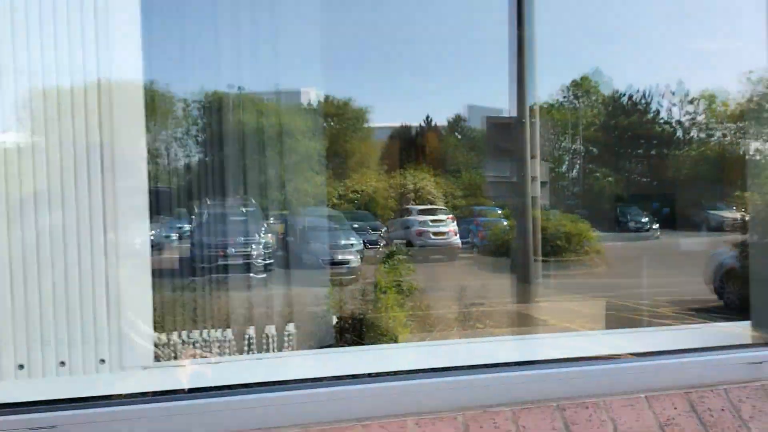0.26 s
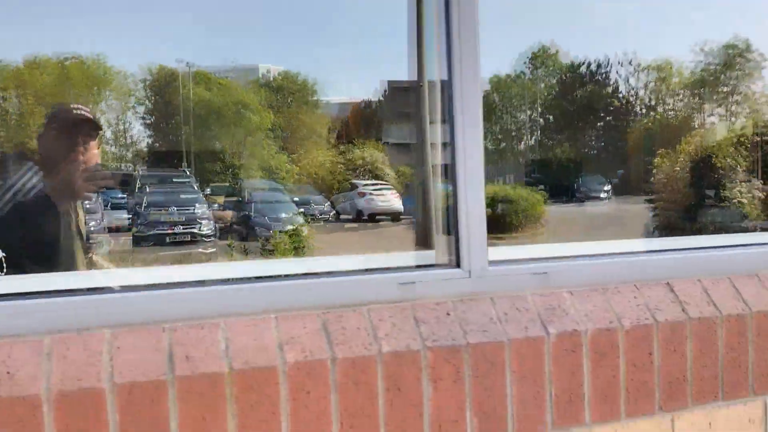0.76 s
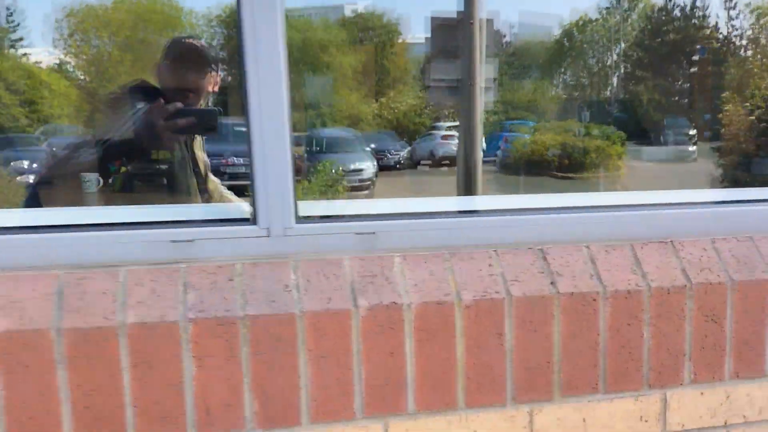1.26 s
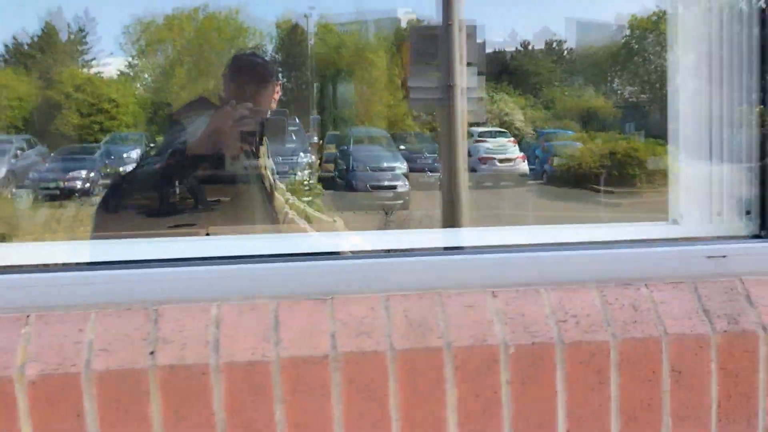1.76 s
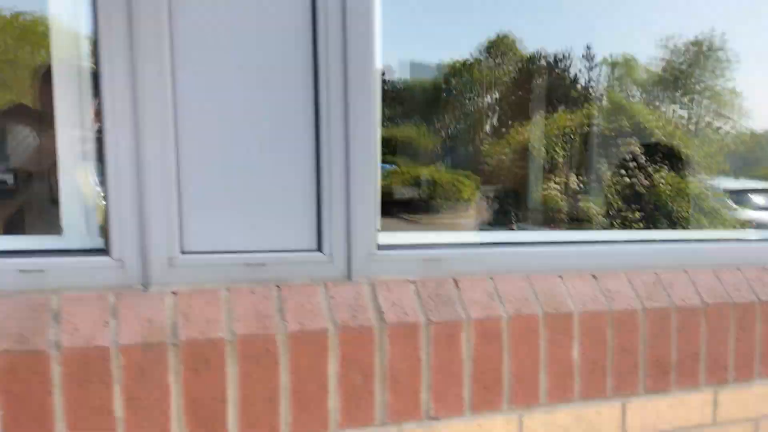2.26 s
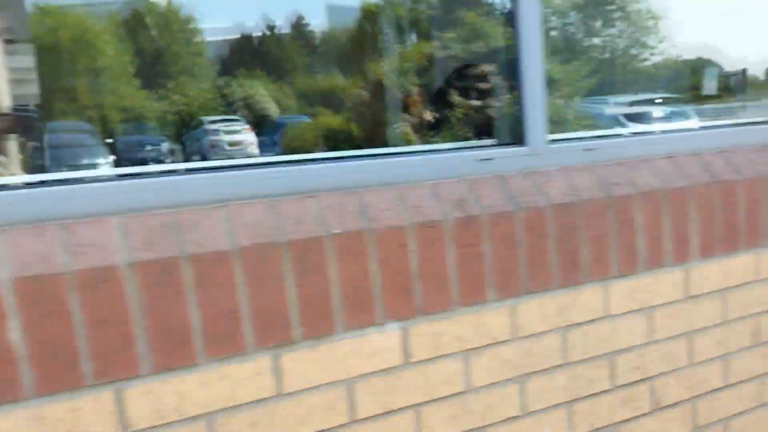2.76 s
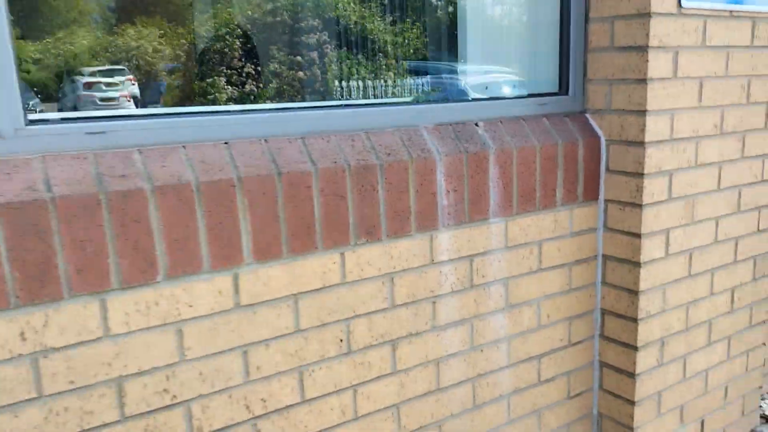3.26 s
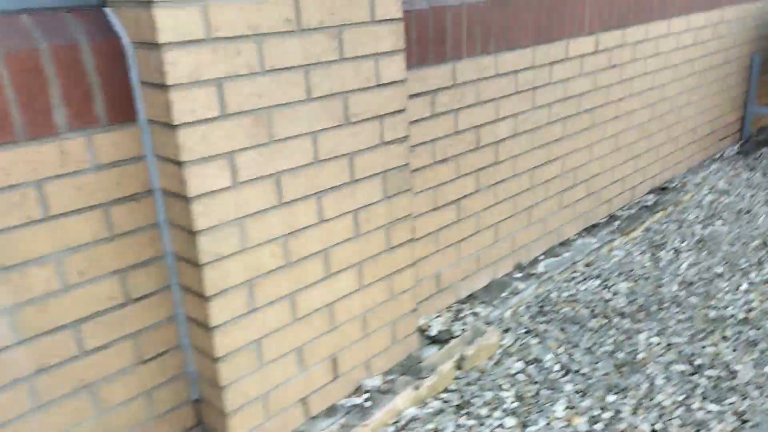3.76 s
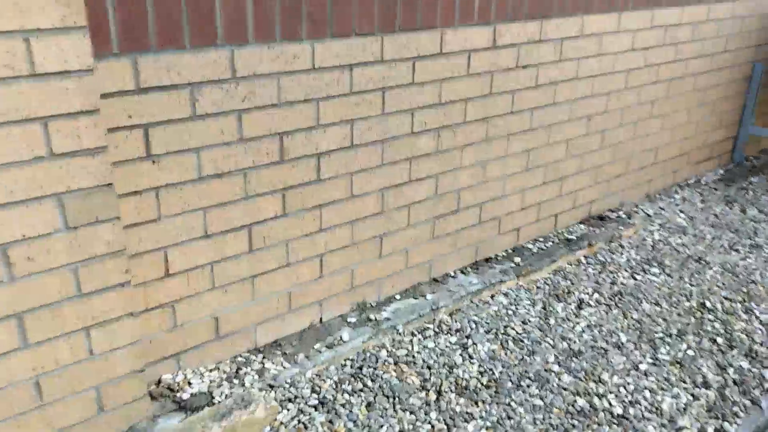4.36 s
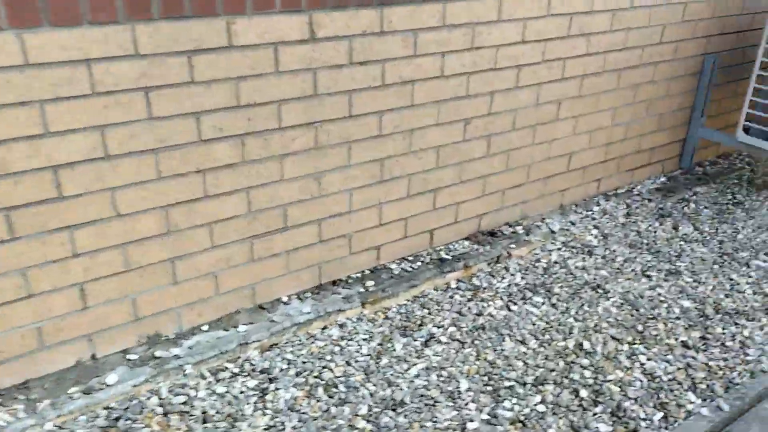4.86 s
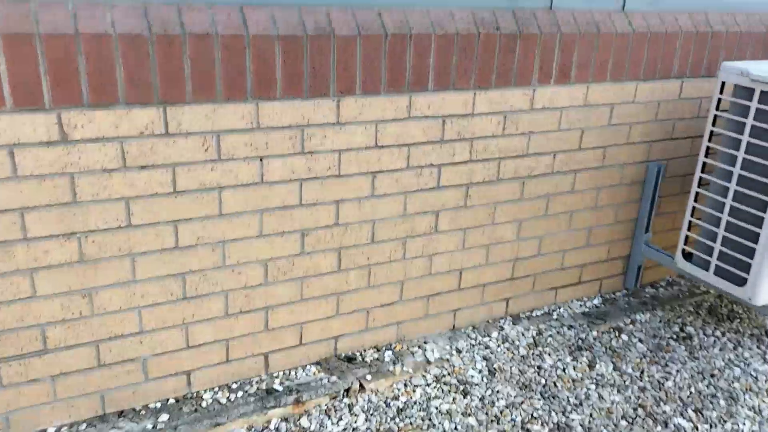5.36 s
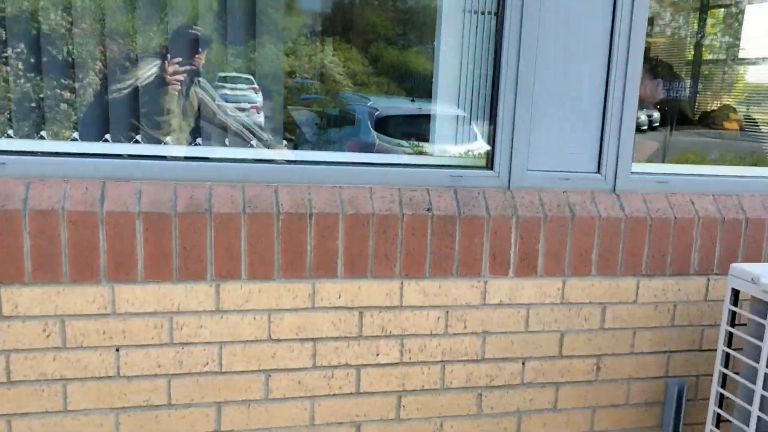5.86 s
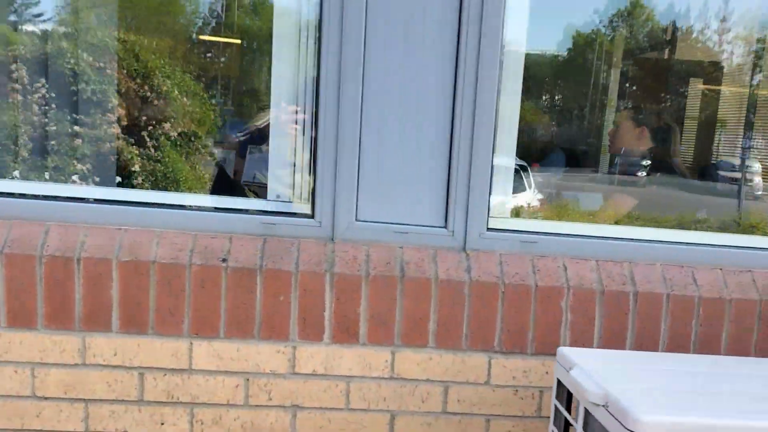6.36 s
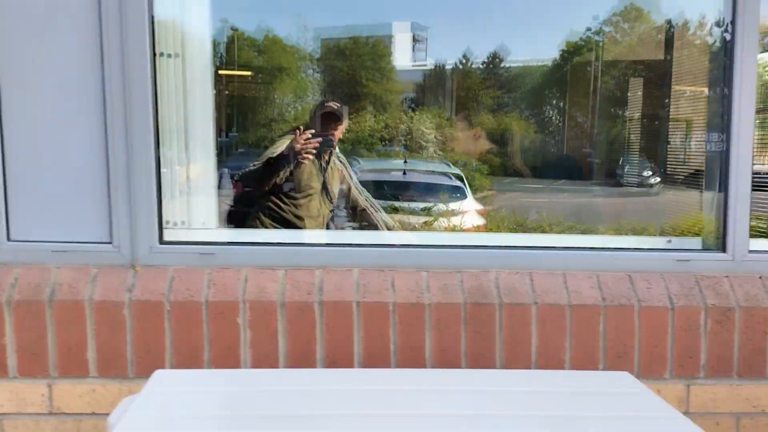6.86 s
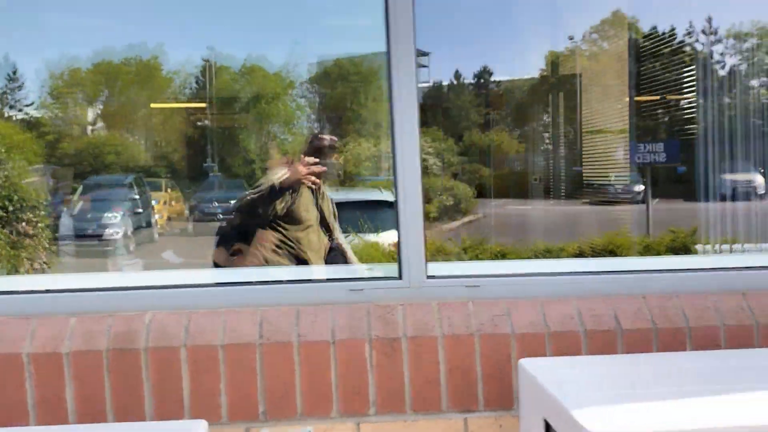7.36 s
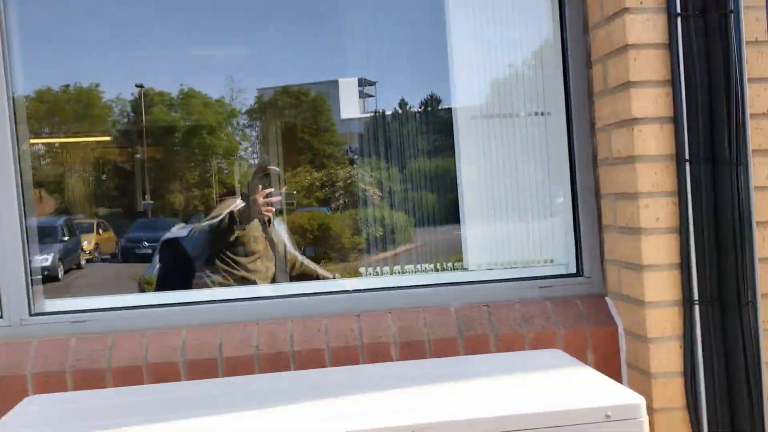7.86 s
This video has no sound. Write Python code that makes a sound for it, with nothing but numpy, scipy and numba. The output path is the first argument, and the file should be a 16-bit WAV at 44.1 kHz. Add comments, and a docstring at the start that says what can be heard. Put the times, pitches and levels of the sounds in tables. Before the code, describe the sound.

A bicycle freewheel ticks rapidly and the chain rattles outdoors, with sharp metallic knocks and low wind buffets on the microphone over distant traffic hum.

```python
"""Outdoors along a wall, a bicycle rolls slowly past a far town hum, and gusts buffet the microphone.
The pawls of the freewheel drop over the ratchet teeth: each tick is a burst of tiny contacts into hub resonances.
The chain rattles as dense contacts into its own resonances, and knocks in the drive ring the frame modes.
Wind is noise through a moving resonant low-pass; the town is noise shaped by a spectrum."""
import sys
import numpy as np
from scipy import signal
from scipy.fft import rfft, irfft
from scipy.io import wavfile
from scipy.ndimage import uniform_filter1d
from numba import njit

SR = 44100
rng = np.random.default_rng(int(sys.argv[2]) if len(sys.argv) > 2 else 0)


def persist_wave(psi):
    """Save psi, clipped to +-1, as 16-bit WAV."""
    counts = np.round(np.clip(psi, -1, 1) * 32767).astype(np.int16)
    wavfile.write(sys.argv[1], SR, np.atleast_2d(counts).T)


N = 358091


def from_db(db):
    """Decibels to amplitude factor."""
    return 10 ** (np.asarray(db) / 20)


def rms_one(x):
    """Scale to an rms of 1."""
    return x / np.sqrt(np.mean(x ** 2) + 1e-20)


def in_time(rows):
    """Columns of a curve, interpolated at every sample."""
    s, *columns = np.transpose(rows)
    return [np.interp(np.arange(N) / SR, s, column) for column in columns]


def drift(rate):
    """Slow chance: noise through a double one-pole low-pass at this rate per second, run in; rms 1."""
    r = np.exp(-2 * np.pi * rate / SR)
    noise = rng.standard_normal(N + SR)
    return rms_one(signal.lfilter([1], [1, -2 * r, r * r], noise)[SR:])


def resonance(x, hz, width_hz):
    """Two-pole band-pass with gain 1 on top."""
    r = np.exp(-np.pi * width_hz / SR)
    feedback = [1, -2 * r * np.cos(2 * np.pi * hz / SR), r * r]
    return signal.lfilter([(1 - r * r) / 2, 0, (r * r - 1) / 2], feedback, x)


def contacts(per_s, spread_db):
    """Tiny metal contacts at random moments, a few much harder than the rest; rms 1."""
    hardness = np.minimum(rng.exponential(1, N), 5)
    sizes = from_db(spread_db * hardness) * rng.choice([-1, 1], N)
    return rms_one(sizes * (rng.random(N) < per_s / SR))


def noisy_tail(x, tail_db):
    """A short decaying noise tail follows the direct sound, as scattered by ground and wall."""
    t60_s, cut_hz = 0.13, 15000
    t = np.arange(SR // 4) / SR
    tail = rng.standard_normal(len(t)) * from_db(-60 * t / t60_s) * (t > .003)
    tail = signal.lfilter(*signal.butter(1, cut_hz, fs=SR), tail)
    return x + from_db(tail_db) * signal.oaconvolve(x, tail / np.linalg.norm(tail))[:N]


def town():
    """Smooth far traffic and tyre noise: shaped noise whose level drifts slowly."""
    # Spectrum of the hum. Each row: frequency in Hz, relative density in dB per Hz.
    spectrum = [(30, -2.5), (80, -3), (250, -2), (700, -2.5), (1100, -3), (1800, -14.5), (3500, -18.5),
                (5000, -26), (8000, -44.5), (10500, -57.5), (15000, -55)]
    level_db = -50.5
    point_hz, point_db = np.transpose(spectrum)
    hz = np.maximum(np.fft.rfftfreq(N, 1 / SR), 10)
    shape = from_db(np.interp(np.log(hz), np.log(point_hz), point_db))
    hum = irfft(rfft(rng.standard_normal(N)) * shape, N)
    return from_db(level_db + 1.2 * drift(0.22)) * rms_one(hum)


@njit
def eddies(noise, hz, damping):
    """Resonant low-pass, applied twice, whose corner moves."""
    out, state = np.empty(len(noise)), np.zeros(4)
    for i in range(len(noise)):
        step, x = 2 * np.sin(np.pi * hz[i] / SR), noise[i]
        for k in (0, 2):
            state[k + 1] += step * (x - state[k] - damping * state[k + 1])
            state[k] += step * state[k + 1]
            x = state[k]
        out[i] = x
    return out


def wind():
    """Lumpy pressure on the microphone port: a flow whose eddy pitch rises with level, and buffets on top."""
    # Air flow on the microphone. Each row: time in seconds, level in dB ahead of the flutter.
    gusts = [(0, -105), (1.4, -73), (2.05, -60), (2.3, -55), (2.5, -56), (2.95, -37), (3.25, -60.5),
             (3.6, -39.5), (4.0, -50.5), (4.25, -60.5), (4.65, -42.5), (5.2, -42), (5.9, -51), (6.3, -47.5),
             (6.6, -54), (7.25, -53.5), (7.55, -51), (8.12, -63)]
    # Single buffets. Each row: centre in seconds, nominal width in seconds, level in dB, nominal eddy pitch in Hz.
    buffets = [(1.408, 0.0093, -38, 162), (1.466, 0.014, -40, 128), (1.715, 0.045, -42, 138),
               (2.18, 0.024, -28.5, 162), (2.24, 0.015, -37, 147), (2.281, 0.039, -35, 142),
               (2.375, 0.021, -35, 160), (2.629, 0.011, -37, 270), (2.695, 0.013, -31.5, 133),
               (2.881, 0.0079, -34, 184), (2.942, 0.02, -28, 167), (2.986, 0.041, -31, 310),
               (3.056, 0.01, -34, 212), (3.178, 0.011, -39.5, 187), (3.464, 0.013, -28.5, 158),
               (3.55, 0.012, -21, 176), (3.622, 0.035, -21, 170), (3.763, 0.0075, -30.5, 142),
               (3.856, 0.0084, -28.5, 185), (4.05, 0.047, -31.5, 152), (4.467, 0.011, -39, 186),
               (4.503, 0.026, -43, 131), (4.592, 0.044, -28, 175), (4.667, 0.0071, -17.5, 156),
               (4.705, 0.012, -21.5, 240), (4.839, 0.018, -17, 200), (4.886, 0.035, -12.5, 217),
               (4.958, 0.037, -17.5, 197), (5.009, 0.027, -14.5, 182), (5.112, 0.029, -24, 211),
               (5.2, 0.039, -10.5, 252), (5.266, 0.022, -9, 183), (5.326, 0.025, -9.5, 335),
               (5.359, 0.015, -12, 284), (5.429, 0.017, -29, 152), (5.555, 0.026, -17.5, 318),
               (5.584, 0.035, -23, 213), (5.663, 0.011, -23, 193), (5.742, 0.054, -38, 124),
               (5.805, 0.023, -29.5, 153), (6.114, 0.014, -31.5, 130), (6.166, 0.014, -32.5, 163),
               (6.359, 0.037, -28, 174), (7.366, 0.023, -35.5, 194), (7.425, 0.025, -28.5, 162),
               (7.489, 0.027, -31.5, 142), (7.686, 0.052, -36, 213), (7.743, 0.086, -41.5, 205)]
    eddy_hz, eddy_db_per_octave = 231, 43   # eddy pitch of a -10 dB flow; stronger flow sheds faster eddies

    flow_db = in_time(gusts)[0] + 3.5 * drift(34)
    power = from_db(2 * flow_db)
    pitch_sum = power * eddy_hz * 2 ** ((flow_db + 10.0) / eddy_db_per_octave)
    t = np.arange(N) / SR
    for s, width, db, hz in buffets:
        near = slice(max(round((s - 2 * width) * SR), 0), round((s + 2 * width) * SR))
        puff = from_db(2 * db) * np.exp(-np.abs((t[near] - s) / (0.53 * width)) ** 1.54)
        power[near] += puff
        pitch_sum[near] += 1.028 * hz * puff

    lumps = drift(29.0)   # a harder lump is also a faster one
    hz = np.clip(pitch_sum / power * 2 ** (0.28 * lumps), 40, 1500)   # the strongest eddy weighs most
    flow = eddies(rng.standard_normal(N), hz, 1.086) / np.sqrt(hz)
    flow = signal.sosfilt(signal.butter(2, 100, "high", fs=SR, output="sos"), flow)
    steady = flow / np.sqrt(uniform_filter1d(flow ** 2, SR // 40) + 1e-20)   # level evened out over 25 ms
    pressure = np.sqrt(power) * from_db(0.12 * lumps) * steady
    return signal.sosfilt(signal.butter(2, 60, "high", fs=SR, output="sos"), pressure)   # the port vents slow pressure


def rattling():
    """Level in dB and best excited Hz of the chain: rattles add in power, and the loudest weighs most on the colour."""
    # The chain runs or shakes. Each row: loudest moment in seconds, rise in seconds per 10 dB,
    # fall in seconds per 10 dB, nominal level in dB, best excited pitch in Hz.
    rattles = [(.05, .3, 0.11, -42, 3800), (.3, 0.18, 0.037, -40, 4000), (.8, 0.074, 0.07, -46, 2260),
               (.93, 0.11, 0.032, -42.5, 1530), (1.55, 0.16, 0.16, -44.5, 2360),
               (2.1, 0.083, 0.12, -37, 3030), (2.84, 0.2, 0.17, -50.5, 3060),
               (3.57, 0.098, .2, -41.5, 2670), (3.95, 0.09, 0.057, -43, 2920),
               (4.261, 0.025, 0.14, -53.5, 3900), (5.25, 0.47, 0.24, -57, 2700),
               (6.3, 0.44, 1, -54.5, 3800), (7.74, 0.091, 0.13, -49.5, 2330), (8.1, 0.81, .1, -62, 3800)]
    t = np.arange(N) / SR
    power = []
    for s, rise, fall, db, _ in rattles:
        away = np.where(t < s, (s - t) / rise, (t - s) / fall)
        power.append(from_db(2 * db - 20 * away) + 1e-12)
    total = np.sum(power, axis=0)
    return 10 * np.log10(total), np.transpose(rattles)[4] @ np.array(power) / total


def chain():
    """Links and rollers rattle densely; the resonances near the best excited pitch swell most."""
    # Chain and sprocket resonances. Each row: frequency in Hz, width in Hz, relative level in dB.
    links = [(1630, 38, 10), (1710, 790, -11.5), (2435, 200, 1.5), (3160, 1160, 5), (3070, 1200, 4.5),
             (3880, 250, 2.5), (4070, 200, -23.5), (5990, 360, 7.5)]
    wander_db, wander_per_s = 2, 5   # each resonance wanders on its own
    level_db, best_hz = rattling()
    rattle = contacts(2500, spread_db=2.5) * from_db(1.2 * drift(60))
    rings = np.zeros(N)
    for k, (hz, width_hz, db) in enumerate(links):
        ring_db = db - 20.0 * np.abs(np.log2(hz / best_hz)) + wander_db * drift(wander_per_s)
        rings += (-1) ** k * from_db(ring_db) * resonance(rattle, hz, width_hz)
    rings = signal.sosfilt(signal.butter(4, 7000, fs=SR, output="sos"), rings)   # grease dulls the contacts
    return from_db(level_db + 0.5) * rms_one(rings)


def knocks():
    """A blow and a short rattle: a dead thud, a broad crack, and the nearest frame modes ring on."""
    # Knocks in drive and frame. Each row: start in seconds, nominal level in dB, best excited pitch in Hz,
    # length in seconds.
    hits = [(0.12, -19, 2380, 0.008), (0.126, -28.5, 960, .006), (0.288, -20, 4400, 0.005),
            (0.77, -26.5, 1190, 0.0059), (.784, -26, 1030, 0.0066), (1.6106, -5, 1020, 0.0016),
            (1.6108, -12, 2810, 0.0023), (1.631, -19, 2840, 0.0085), (1.984, -31.5, 900, 0.012),
            (2.126, -23.5, 660, 0.0048), (2.583, -32, 640, 0.0043), (2.623, -30.5, 675, 0.012),
            (2.961, -11.5, 2990, 0.016), (2.962, -15, 1470, 0.02), (2.965, -13.5, 705, 0.024),
            (3.278, -35, 3770, 0.022), (3.564, -28, 2180, 0.014), (3.947, -28, 1670, 0.019),
            (4.108, -25.5, 1200, 0.0091), (4.112, -22.5, 2980, .015), (4.118, -20, 393, 0.005),
            (4.387, -24, 1320, 0.011), (4.387, -28, 3080, 0.016), (4.39, -24.5, 480, 0.0069),
            (4.461, -40.5, 4530, 0.0064), (4.952, -25.5, 1540, 0.014), (4.951, -18.5, 3000, 0.021),
            (4.96, -22.5, 5560, 0.0095), (5.458, -37, 3850, 0.0016), (6.745, -30.5, 3480, 0.0051),
            (7.581, -38.5, 4730, 0.0032), (7.666, -28.5, 2340, 0.0093), (7.743, -47, 2370, 0.013),
            (7.775, -31, 2190, 0.015), (7.818, -32, 2420, 0.018), (8.073, -31.5, 4140, 0.036)]
    # Frame modes. Each row: frequency in Hz, relative level in dB, T60 in seconds.
    frame = [(384, -1.5, 0.04), (769, -0.5, 0.2), (980, -16, 0.03), (1155, 1, 0.027), (2237, 2, 0.045),
             (3210, 11, 0.0069), (4020, 9.5, 0.016), (4230, 14.5, 0.007), (5540, 8, 0.0063)]
    below_db_per_octave = 30   # modes under the best excited pitch are left nearly still
    blows, out = np.zeros((len(frame), N + SR)), np.zeros(N + SR)
    mode_hz, mode_db, _ = np.transpose(frame)
    t = np.arange(SR // 10) / SR
    for s, db, hz, length in hits:
        rattle = rng.standard_normal(len(t))
        force = 0.76 * rattle * np.exp(-(t / length) ** 3) / np.sqrt(length * SR)
        force[0] += np.sqrt(0.00085 / length)   # short knocks are mostly one blow
        span = slice(round(s * SR), round(s * SR) + len(force))
        distance_db = 9.6 * np.abs(np.log2(mode_hz / hz))
        below_db = below_db_per_octave * np.maximum(np.log2(hz / mode_hz) - .2, 0)
        blows[:, span] += from_db(db + mode_db - 13.5 - distance_db - below_db)[:, None] * force
        thud = resonance(resonance(force, hz, 0.39 * hz), hz, 0.39 * hz) * SR / hz   # twice: a softened contact
        crack = resonance(resonance(force, 4200, 3000), 4200, 3000)
        out[span] += from_db(db + 2.5) * thud + from_db(db + 4) * crack
    for k, (hz, _, t60) in enumerate(frame):
        r, w = from_db(-60 / (t60 * SR)), 2 * np.pi * hz / SR
        ring = signal.lfilter([0, np.sin(w)], [1, -2 * r * np.cos(w), r * r], blows[k] + 1e-18)
        out += (-1) ** k * ring
    return out[:N]


def teeth_passing():
    """Lone ticks, then teeth counted off the rate of each stretch, one tick per whole tooth: seconds, dB."""
    # Faint lone ticks while pedalling. Each row: time in seconds, nominal level in dB.
    stray_ticks = [(7.543, -63.5), (7.578, -61), (7.627, -66), (7.831, -59.5)]
    # Ratchet teeth passing the pawls, one curve per stretch of coasting or back-pedalling.
    # Each row of a curve: time in seconds, rate in teeth per second.
    ratchet = [
        [(0, 120), (.108, 95), (.306, 97), (.355, 130)],
        [(.369, 24.1), (.807, 30.7), (.904, 30), (.978, 25.4), (1.116, 33.3), (1.668, 35.3), (1.994, 44.5)],
        [(2.0, 97), (2.03, 100), (2.1, 121.7), (2.241, 109.3), (2.266, 48), (2.357, 18.1), (2.444, 49.7),
         (2.617, 89.5), (2.682, 62.3), (2.72, 116.5), (2.818, 99.9), (2.917, 64.1)],
        [(3.368, 70.8), (3.55, 72.3), (3.601, 45.9), (3.651, 29.9), (3.734, 70.1), (3.815, 26.9)],
        [(3.883, 26.3), (3.932, 53.5), (4.061, 25.1), (4.087, 48.8), (4.133, 38.7)],
        [(4.21, 14.1), (4.235, 64), (4.376, 21.3), (4.404, 50.3)],
        [(5.469, 18.7), (5.587, 50.1), (5.679, 56.6), (5.928, 40.1), (5.987, 60), (6.184, 51.1), (6.31, 61.5),
         (6.384, 44.9), (6.596, 40.5), (6.689, 24.5), (6.715, 47.5), (6.813, 34.8), (7.087, 38.9),
         (7.177, 48.7), (7.339, 25)],
    ]
    # Level of the counted ticks. Each row: time in seconds, nominal level in dB.
    tick_level = [(0, -57), (.1, -46), (.31, -50), (.4, -49.5), (.8, -48), (1.12, -50.5), (1.58, -48),
                  (1.95, -54), (2.05, -49), (2.25, -50), (2.4, -48), (2.65, -50), (2.78, -48),
                  (2.92, -53.5), (3.37, -50.5), (3.55, -48), (3.85, -52), (3.95, -50.5), (4.08, -53),
                  (4.4, -60.5), (5.47, -52), (5.65, -47), (6.2, -45), (6.45, -46.5), (6.65, -47.5),
                  (6.75, -45), (6.95, -51), (7.34, -51)]
    step_s = .0005
    s, level_db = np.transpose(stray_ticks)
    for stretch in ratchet:
        at, per_s = np.transpose(stretch)
        t = np.arange(at[0], at[-1] + .005, step_s)
        teeth = np.cumsum(np.interp(t, at, per_s)) * step_s
        ticks = np.interp(np.arange(int(teeth[-1]) + 1), teeth, t)
        s = np.append(s, ticks)
        level_db = np.append(level_db, np.interp(ticks, *np.transpose(tick_level)))
    return s, level_db


def freewheel():
    """At each tooth the pawls drop one after another and bounce, exciting the resonances unevenly."""
    # Hub and wheel resonances. Each row: frequency in Hz, width in Hz, relative level in dB.
    hub = [(2110, 29, -38), (2485, 197, -6.5), (3087, 200, -5.5), (3472, 106, -4), (4324, 300, -3.5),
           (5074, 206, 0.5), (5630, 350, -2.5), (7080, 420, -4), (8120, 460, -14), (11800, 440, -10.5),
           (14640, 1300, -14)]
    # Colour of the ticks as the bicycle turns and tilts. Each row: time in seconds, gain under 4 kHz in dB,
    # gain of the ring from 4 to 4.8 kHz in dB, gain above 9 kHz in dB.
    facing = [(0, 8.5, 7.5, -2), (.6, -1.5, 0, -8), (1.2, 1.5, 3.5, -1), (1.8, 7, -0.5, -2),
              (2.45, 1, 4, -2), (2.9, 11, 6, 1), (3.5, -1, -1.5, 0.5), (4.4, 19.5, 16.5, 7.5),
              (5.5, 3.5, 3.5, -2), (5.85, -2.5, 4.5, -8), (6.2, -2.5, -3.5, -8), (7.3, 3, 3.5, -7),
              (7.5, 14.5, -5, -6)]
    lead_s, spread_s, decay_s = 0.0033, 0.0063, 0.0062   # early start, time until the last pawl drops, bounce
    tick_spread_db = 0.5   # no two teeth are struck alike
    colour_drift_db, memory = 2.5, 0.95   # each resonance swells and fades over several teeth

    s, level_db = teeth_passing()
    at = np.round(np.maximum(s - lead_s, 0) * SR).astype(int)
    t = np.arange(SR // 25) / SR
    cluster = np.where(t < spread_s, 0.34 + 0.2 * t / spread_s, np.exp(-(t - spread_s) / decay_s))
    chatter = [contacts(9000, spread_db=3.5) for _ in range(2)]   # neighbouring resonances feel other contacts
    low_db, ring_db, top_db = (column[at] for column in in_time(facing))
    uneven = rng.standard_normal((len(at), len(hub) + 1))   # last column: the whole tick
    level_db = level_db + tick_spread_db * uneven[:, -1]
    chance = rng.standard_normal(uneven.shape)
    turning = signal.lfilter([np.sqrt(1 - memory ** 2)], [1, -memory], chance, axis=0)

    out = np.zeros(N)
    for k, (hz, width_hz, db) in enumerate(hub):
        facing_db = [low_db, ring_db, 0, top_db][np.searchsorted([4000, 4800, 9000], hz)]
        uneven_db = 2.7 * uneven[:, k] + colour_drift_db * turning[:, k]
        teeth = np.zeros(N)
        teeth[at] = from_db(level_db + db + facing_db + 18 + uneven_db)
        force = signal.oaconvolve(teeth, cluster)[:N] * chatter[k % 2]
        out += resonance(force + 1e-18, hz, width_hz)
    return out


def scene():
    """Bicycle, wind and town; hub and chain get a slightly stronger noisy tail, as of the hub rattling on."""
    running = noisy_tail(freewheel() + chain(), tail_db=-9.5)
    knocking = noisy_tail(knocks(), tail_db=-11.5)   # knocks get a weaker one
    return (running + knocking + wind() + town())[None]


def record(dry):
    """Gain control turns loud moments down and recovers; the top is cut."""
    cutoff_hz = 15800
    level_db = 10 * np.log10(uniform_filter1d(dry[0] ** 2, SR // 100) + 1e-12)
    recovery = 60.0 * np.arange(N) / SR   # dB, at 60 dB per s
    held_db = np.maximum.accumulate(level_db + recovery) - recovery
    excess_db = np.maximum(held_db + 19.0, 0)   # above -19 dB
    gain = from_db(-.15 * uniform_filter1d(excess_db, SR // 100))
    return signal.sosfilt(signal.ellip(10, 1, 70, cutoff_hz, fs=SR, output="sos"), dry * gain)


dry = scene()
out = record(dry)
persist_wave(out)
```